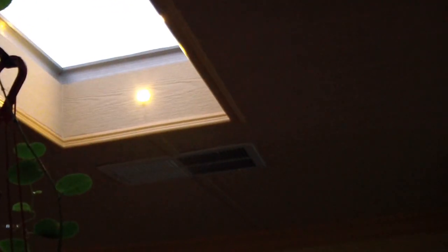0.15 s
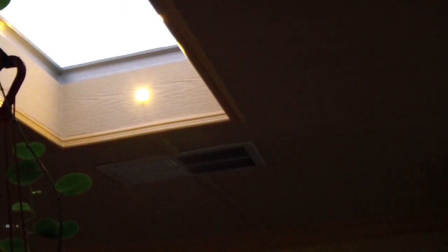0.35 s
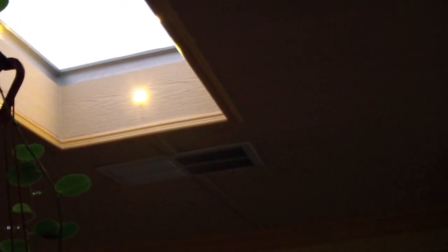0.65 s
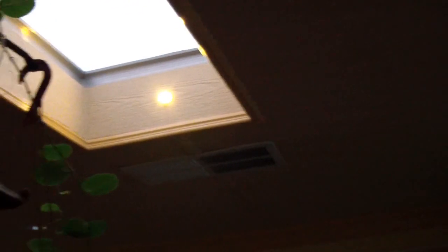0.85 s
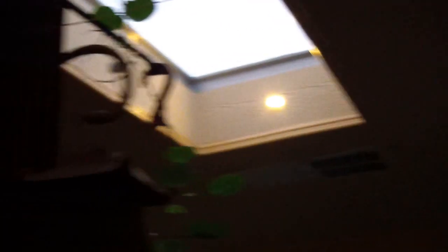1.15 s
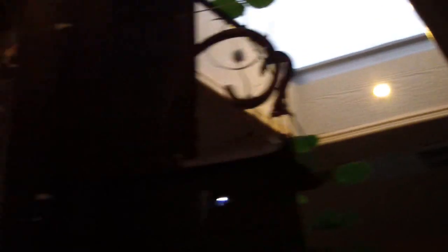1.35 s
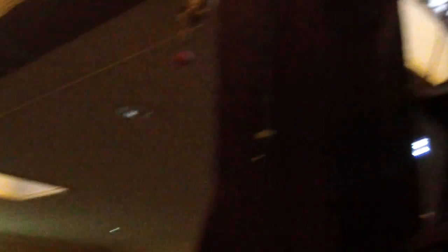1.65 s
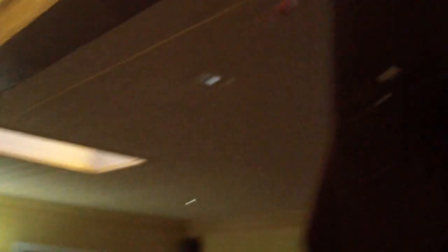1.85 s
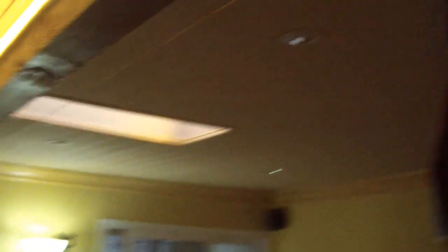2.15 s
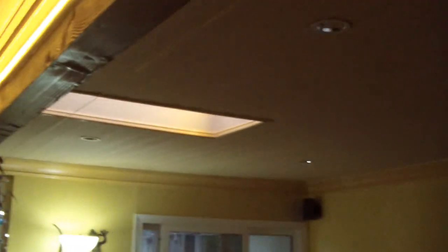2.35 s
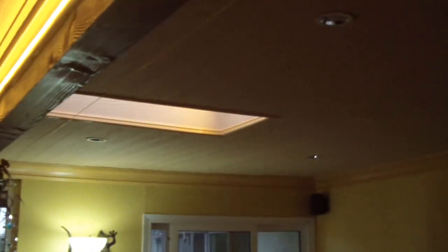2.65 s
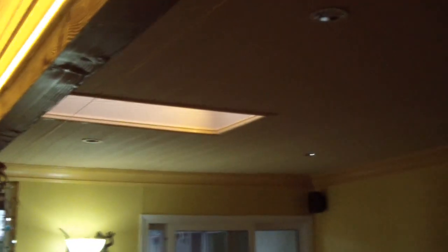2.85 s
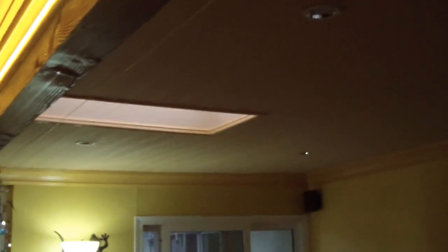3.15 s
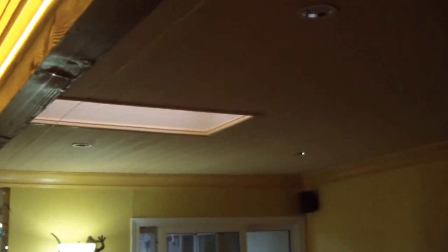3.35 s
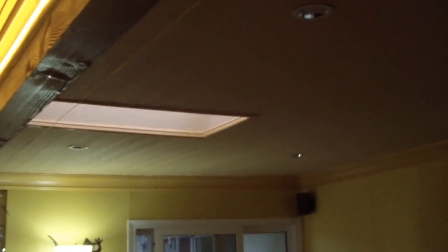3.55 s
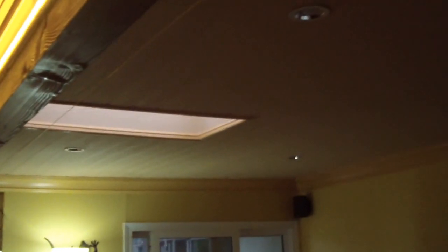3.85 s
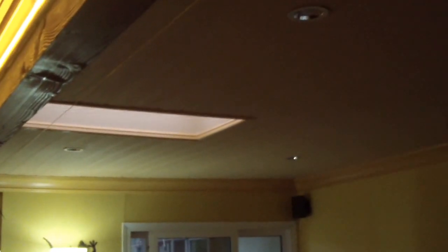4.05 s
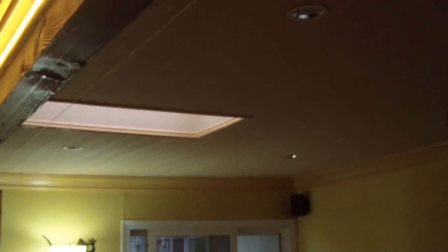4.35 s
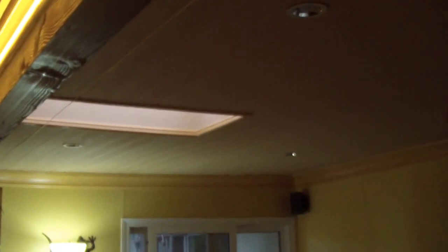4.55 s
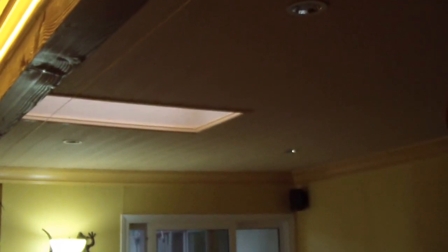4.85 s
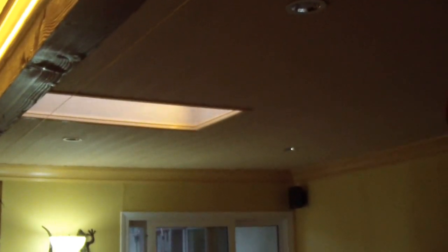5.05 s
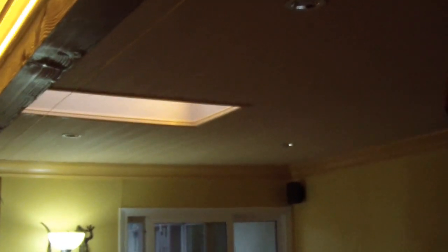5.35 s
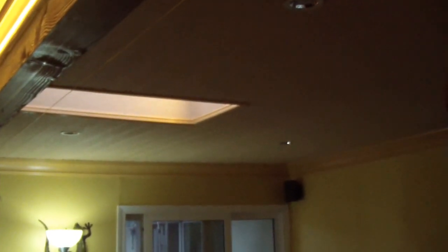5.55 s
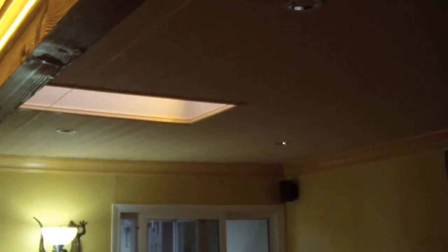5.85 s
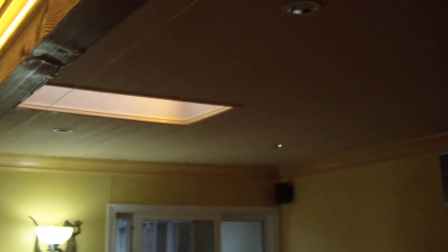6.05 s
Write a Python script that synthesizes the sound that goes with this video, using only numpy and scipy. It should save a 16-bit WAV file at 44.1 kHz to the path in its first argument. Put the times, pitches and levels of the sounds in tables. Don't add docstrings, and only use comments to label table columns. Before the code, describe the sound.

Indoors, knuckly knocks on a wooden panel, then a violently loud switch snap, faint creaks, and a second slower snap two seconds later.

```python
import sys
import numpy as np
from scipy import signal
from scipy.fft import rfft, irfft, next_fast_len
from scipy.io import wavfile
from scipy.ndimage import uniform_filter1d, map_coordinates

SR = 44100
rng = np.random.default_rng(int(sys.argv[2]) if len(sys.argv) > 2 else 0)


def linear_from_db(decibels):
    return 10 ** (np.asarray(decibels, float) / 20)


def wav_record(signal):
    frames = np.transpose(np.atleast_2d(signal))
    bounded = np.clip(frames, -1, 1)
    quanta = np.round(bounded * 32767).astype(np.int16)
    wavfile.write(sys.argv[1], SR, quanta)


N = 273861

# pitch_hz, level_db (per Hz)
RUMBLE_TONE = [(12, -32), (20, 1.5), (109, -3.5), (140, -8), (170, -2.5), (194, -11.5), (236, -6.5),
               (264, -12), (436, -15), (462, -14), (925, -22.5), (980, -20.5), (2000, -30.5), (2600, -50.5),
               (4400, -120)]
# pitch_hz, likeness (0 to 1)
RUMBLE_ALIKE = [(30, 0.676), (100, 0.83), (400, 0.532), (2000, 0.357)]
# pitch_hz, level_db (per Hz)
HISS_TONE = [(530, -13.5), (900, -5.5), (1000, -10), (1420, -5.5), (1610, -7), (2050, -7), (2910, -7),
             (12400, -14), (16200, -19)]
# pitch_hz, likeness (0 to 1)
HISS_ALIKE = [(60, 0.69), (180, 0.73), (550, 0.17), (1650, 0.297), (4970, 0.07), (15000, 0.078)]
# pitch_hz, width_hz, level_db
DRONES = [(118.4, 4, -60), (169.74, 14.7, -60), (475.2, 5.1, -65.5), (975.7, 16.2, -68.5)]
# pitch_hz, fade_s (to fall 60 dB)
ROOM_FADE = [(60, 0.101), (300, 0.698), (1200, 0.761), (3000, 0.646), (6000, 0.554), (10000, 0.4444),
             (15000, 0.2546)]
# pitch_hz, likeness (0 to 1)
ROOM_ALIKE = [(60, 0.55), (180, 1), (550, 0.961), (1650, 1), (4970, 0.8), (15000, 0.18)]
# pitch_hz, likeness (0 to 1)
NEAR_ALIKE = [(500, 0.974), (3000, 0.999), (8000, 0.717), (14000, 0.098)]

# start_s, level_db, hold_s
CREAKS = [
    (3.45, -61, 0.267),
    (3.93, -62, 0.18),
    (5.308, -57.5, 0.2),
    (6.0, -57.5, .1),
]
# pitch_hz, level_db
JOLT_MODES = [(47, 0), (26, -5)]
# start_s, level_db, rise_s, hold_s, fade_s
STROKES = [
    (1.961, -50, 0.0524, 0.054, 0.13),
    (2.067, -46, 0.0215, 0.027, 0.917),
]
# pitch_hz, level_db (per Hz)
SLIDE_TONE = [(900, -15.5), (1500, 8.5), (2200, 2.5), (3000, 4.5), (4200, -0.5), (6500, -5), (9000, -10),
              (12000, -14), (16000, -29.5)]
# pitch_hz, width_hz, lift_db
HOLLOW_WALL = [(1473, 147, 8), (2190, 220, 9)]

# start_s, peak_db, pitch_hz, length_s
TICKS = [(0.898, -41.5, 1290, 0.0645), (1.533, -37, 6000, .0078), (2.39, -35.5, 7900, 0.0051),
         (2.75, -26, 12000, 0.00196), (2.754, -34, 11000, 0.00296), (2.785, -38, 7000, 0.0031),
         (4.271, -29.5, 10000, .002), (4.272, -38, 2000, 0.0071), (5.55, -39.5, 9000, .0052),
         (6.1535, -23.5, 1590, 0.000755), (6.1537, -23.5, 11000, 0.00051), (6.156, -33, 3500, 0.0114),
         (6.158, -42.5, 9000, 0.076), (6.194, -48, 6000, .024)]
# start_s, peak_db, pitch_hz, length_s
TAPS = [
    (2.784, -36.5, 1160, 0.0063),
    (6.117, -41.5, 1300, 0.0204),
]
# start_s, peak_db, pitch_hz, length_s
SQUEAKS = [
    (1.949, -43, 2906, 0.108),
    (1.957, -45, 2432, 0.094),
    (4.933, -46, 3600, 0.034),
]

# start_s, push_db, push_length_s, lingering_db
KNOCKS = [
    (2.0265, -17.5, 0.00146, -23.5),
    (2.0847, -6, 0.001194, -26.5),
    (2.123, -27.5, 0.00064, -30),
    (2.1535, -20.5, .0012, -26),
    (2.355, -34.5, 0.00194, -15),
    (2.425, -33, 0.0023, -15),
]
# pitch_hz, width_hz, level_db
WOOD = [(215.4, 42, 2.5), (456, 69, -1), (824, 83, 1.5), (1400, 180, 4.5), (2200, 280, 17),
        (3150, 810, -24)]
# pitch_hz, level_db, fade_s (to fall 60 dB)
PANEL = [(169.7, -4, 0.74), (222, -4.5, 1.84), (262, -9.5, 1.5), (442.5, -3.5, 0.95), (474.3, -5, 1.14),
         (806.5, -9, 0.32)]

# slam_s, room_db, overload_db, slowness (of the rocker, 1 = normal)
SNAPS = [
    (-.3, -5.4, 0, 1),
    (3.0252, -1.2, 21.2, 1.047),
    (4.9637, -3.6, 18.8, 1.25),
]
# after_slam_s, level_db, rise_s, length_s
CONTACTS = [
    (-.0025, -19.2, 0.00044, 0.0038),
    (0, 10.3, 0.00115, 0.002636),
    (.0041, 11.2, .00087, .0024),
    (.0068, 10.2, 0.00114, 0.0028),
]
# pitch_hz, level_db (per Hz)
CRACK_OFF = [(180, -62), (700, -19.5), (2760, -10.5), (3310, -1.5), (3790, -3), (4860, -3), (5370, -5.5),
             (6460, -3), (8860, -10.5), (9800, -5), (12000, -11.5), (13000, -3.5), (16200, -18)]
CRACK_ON = [(180, -44), (300, -11.5), (1460, -21), (2180, -1), (3540, -4), (4330, -1), (5370, -5.5),
            (5940, -1), (6680, -16), (7500, 0.5), (12600, -5.5), (13700, -5), (16200, -6.5)]
# pitch_hz, level_db (per Hz)
BROAD_PAST = [(240, -49), (400, -18.5), (1230, -13), (1710, -7.5), (1930, -8), (2670, -2), (4950, -1),
              (16000, -17.5)]
BROAD_OFF = [(210, -51.5), (350, -24), (959, -15.5), (1300, -20), (1680, -10), (2240, -13), (2630, -7.5),
             (4240, -4), (13900, -14.5), (16000, -39)]
BROAD_ON = [(210, -47.5), (350, -18.5), (653, -18), (844, -14), (1680, -10.5), (2000, -3), (2630, -5),
            (4380, -2.5), (8850, -6.5), (13600, -13.5), (16000, -21.5)]
# pitch_hz, width_hz, lift_db
RING_PAST = [(2177, 150, 6), (2720, 44, 3), (4000, 200, 1), (4920, 220, 3)]
RING_OFF = [(1540, 233, 4.33), (2588, 184, 8.5), (3398, 387, 11.45), (4213, 223, 9.06), (4923, 226, 7.8),
            (6320, 810, 6)]
RING_ON = [(1091, 104, 5.5), (1780, 320, -2), (2130, 205, 4), (2983, 157, 4.5), (3930, 227, 7),
           (4374, 124, 6), (5220, 305, 3), (6400, 230, 3)]
# pitch_hz, level_db (per Hz)
THUD_TONE = [(25, -5), (60, 2.5), (200, -7), (450, -17), (800, -27.5)]
# start_s, pitch_hz, level_db, fade_s (to fall 60 dB)
SPRING = [
    (-.3, 2717, -46, 2.36),
    (-.3, 2732, -45.5, 2.2),
    (3.028, 2605, -16.5, 0.435),
    (3.029, 2720, -38.5, 1.35),
    (4.965, 4355, -19, 0.5),
]


def unit(x):
    return x / np.sqrt(np.mean(x ** 2) + 1e-20)


def along(points, hz):
    point_hz, value = np.transpose(points)
    return np.interp(np.log(hz + 1), np.log(point_hz + 1), value)


def peak(hz, centre, width):
    return 1 / (1 + (2 * (hz - centre) / width) ** 2)


def resonator(hz, centre, width):
    return 1j * hz * width / (centre ** 2 - hz ** 2 + 1j * hz * width)


def filtered(x, response):
    size = next_fast_len(x.shape[-1] + 8192)
    spectrum = rfft(x, size) * response(np.fft.rfftfreq(size, 1 / SR))
    return irfft(spectrum, size)[..., :x.shape[-1]]


def causal(x, db_of):
    hz = np.fft.rfftfreq(8192, 1 / SR)
    cepstrum = irfft(np.log(linear_from_db(np.maximum(db_of(hz), -70))))
    cepstrum[1:4096] *= 2
    cepstrum[4097:] = 0
    kernel = irfft(np.exp(rfft(cepstrum)))[None, :4096]
    return signal.fftconvolve(x, kernel / np.linalg.norm(kernel), axes=1)[:, :x.shape[1]]


def stereo(pair, alike):
    def shares(hz):
        turn = np.arccos(np.clip(along(alike, hz), -1, 1)) / 2
        return np.array([np.cos(turn), np.sin(turn)])

    mid, side = filtered(pair, shares)
    return np.array([mid + side, mid - side])


def noise(gain, alike):
    return unit(stereo(filtered(rng.standard_normal((2, N)), gain), alike))


def add(track, sound, s):
    at = round(s * SR)
    part = sound[:, max(-at, 0):N - at]
    track[:, max(at, 0):][:, :part.shape[1]] += part


def wobble(rate):
    knots = rng.standard_normal(int(N * rate / SR) + 4)
    return map_coordinates(knots, [np.arange(N) * rate / SR])


def swell(s, rise, hold, fade):
    db = np.interp(np.arange(N) / SR, np.cumsum([s, rise, hold, fade]), [-30, 0, 0, -30])
    return linear_from_db(db) - linear_from_db(-30)


def reverb():
    hz, t, spectrum = signal.stft(rng.standard_normal((2, SR)), SR, nperseg=256)
    fading = linear_from_db(-60 * t / along(ROOM_FADE, hz)[:, None])
    tail = signal.istft(spectrum * fading, SR, nperseg=256)[1][:, :SR]
    build = 1 - np.exp(-np.arange(SR) / SR / 0.00257)
    return stereo(tail, ROOM_ALIKE) * build


def burst(length, rise):
    t = np.arange(max(SR // 4, int(2 * length * SR))) / SR
    shape = (1 - np.exp(-t / rise)) * linear_from_db(-20 * t / length)
    spectrum = rfft(stereo(rng.standard_normal((2, len(t))), NEAR_ALIKE) * shape)
    even = irfft(spectrum / uniform_filter1d(np.abs(spectrum), size=100), len(t))
    even = even * (shape > 1e-3)
    return even * np.linalg.norm(shape) / np.linalg.norm(even[0])


def quiet_floor():
    house_db = -47 + 0.29 * np.arange(N) / SR + 0.76 * wobble(rate=2.467)
    rumble = linear_from_db(house_db) * noise(lambda hz: linear_from_db(along(RUMBLE_TONE, hz)), RUMBLE_ALIKE)
    drones = np.zeros((2, N))
    for centre, width, db in DRONES:
        drones += linear_from_db(db) * noise(lambda hz: peak(hz, centre, width), [(100, 0.988)])
    hiss = linear_from_db(-52) * noise(lambda hz: linear_from_db(along(HISS_TONE, hz)), HISS_ALIKE)
    return rumble + drones + hiss


def creaks():
    ease_s = 0.157
    load = sum(linear_from_db(db) * swell(s, ease_s, hold, ease_s) for s, db, hold in CREAKS)
    tone = lambda hz: peak(hz, 1349.6, 70) + peak(hz, 1529, 70)
    flutter = linear_from_db(2.8 * wobble(rate=14))
    return load * flutter * noise(tone, ROOM_ALIKE)


def jolt():
    shake = np.zeros(N)
    for hz, db in JOLT_MODES:
        pitch_hz = hz * (1 + 0.12 * wobble(rate=53))
        shake += linear_from_db(db) * np.sin(2 * np.pi * np.cumsum(pitch_hz) / SR)
    return linear_from_db(-31.5) * swell(2.53, rise=0.119, hold=0.1184, fade=0.222) * shake


def slide():
    hollow_db = lambda hz: sum(up * peak(hz, centre, width) for centre, width, up in HOLLOW_WALL)
    tone = lambda hz: linear_from_db(along(SLIDE_TONE, hz) + hollow_db(hz))
    pressure = sum(linear_from_db(db) * swell(s, *shape) for s, db, *shape in STROKES)
    skin = pressure * noise(tone, ROOM_ALIKE)
    air = noise(lambda hz: peak(hz, 8300, 5000), ROOM_ALIKE)
    sleeve = linear_from_db(-55.5) * swell(1.928, rise=0.252, hold=0.201, fade=0.31) * air
    roughness = linear_from_db(1.58 * wobble(rate=88))
    return roughness * (skin + sleeve)


def ticks():
    out = np.zeros((2, N))
    for rows, wide in ((TICKS, 1.08), (TAPS, 0.285), (SQUEAKS, 0.029)):
        for s, peak_db, centre, length in rows:
            contact = burst(length, rise=length / 8)
            tick = filtered(contact, lambda hz: resonator(hz, centre, wide * centre))
            add(out, linear_from_db(peak_db) * tick / np.abs(tick).max(), s)
    return out


def knocks():
    out = np.zeros((2, N))
    wood = lambda hz: sum(linear_from_db(db) * resonator(hz, centre, width) for centre, width, db in WOOD)
    t = np.arange(SR) / SR * np.ones((2, 1))
    for s, db, length, linger_db in KNOCKS:
        bump = lambda at: np.sin(np.pi * np.clip((t - at) / length, 0, 1)) ** 2
        push = 0.28 * bump(0) - bump(0.001099) + 0.475 * bump(0.004056)
        knock = push - linear_from_db(-4.6) * filtered(bump(0.001058), wood)
        knock = filtered(knock, lambda hz: 1j * hz / (125 + 1j * hz))
        add(out, linear_from_db(db + 0.93) * knock, s - 0.001)

        modes = np.zeros((2, SR))
        for hz, up, fade_s in PANEL:
            mode_db = up + rng.normal(0, 2) - 60 * t / fade_s
            modes += linear_from_db(mode_db) * np.sin(2 * np.pi * hz * t)
        add(out, linear_from_db(db + linger_db - 9.6) * modes * (1 - np.exp(-t / 0.014)), s)

        answer = signal.fftconvolve(reverb(), knock[:, :4096], axes=1)
        add(out, linear_from_db(db + linger_db - 16) * answer, s + 0.003914)
    return out


def switch_cracks():
    out = np.zeros((2, N))
    for (s, _, _, slow), tone in zip(SNAPS[1:], (CRACK_OFF, CRACK_ON)):
        for after, db, rise, length in CONTACTS:
            crack = causal(burst(length, rise), lambda hz: along(tone, hz))
            add(out, linear_from_db(db) * crack, s + slow * after)
    return out


def switch_room():
    out = np.zeros((2, N))
    broads = (BROAD_PAST, BROAD_OFF, BROAD_ON)
    rings = (RING_PAST, RING_OFF, RING_ON)
    for (s, db, _, _), broad, ring in zip(SNAPS, broads, rings):
        lift = lambda hz: sum(up * peak(hz, centre, width) for centre, width, up in ring)
        tilt = lambda hz: 60 * 0.0808 / along(ROOM_FADE, hz)
        tail = causal(reverb(), lambda hz: along(broad, hz) + lift(hz) + tilt(hz))
        add(out, linear_from_db(db) * tail, s + 0.003)
    return out


def switch_body():
    out = np.zeros((2, N))
    for s, *_ in SNAPS[1:]:
        thud = causal(burst(length=0.142, rise=0.003), lambda hz: along(THUD_TONE, hz))
        add(out, linear_from_db(-28) * thud, s + 0.003985)
    t = np.arange(2 * SR) / SR
    for s, hz, db, fade_s in SPRING:
        ringing = linear_from_db(db - 60 * t / fade_s) * np.sin(2 * np.pi * hz * t)
        add(out, ringing * np.ones((2, 1)), s)
    return out


def scene():
    switch = switch_cracks() + switch_room() + switch_body()
    hand = knocks() + ticks() + slide() + jolt()
    background = quiet_floor() + creaks()
    return switch + hand + background


def roll_off(x):
    return signal.sosfilt(signal.butter(12, 16310, fs=SR, output="sos"), x)


def record(dry):
    t = np.arange(N) / SR
    duck_db = np.zeros(N)
    for s, _, depth_db, slow in SNAPS[1:]:
        since = t - s - slow * 0.00273
        bite = np.clip(since / 0.00384, 0, 1)
        hold_s, release_s = 0.0016 * depth_db, 0.0061 * depth_db
        left = np.clip(1 - (since - hold_s) / release_s, 0, 1)
        duck_db -= depth_db * bite * left ** 1.26
    ducked = dry * linear_from_db(duck_db)
    clipped = ducked / (1 + np.abs(ducked) ** 8) ** (1 / 8)
    return roll_off(clipped)


dry = scene()
out = record(dry)
wav_record(out)
```